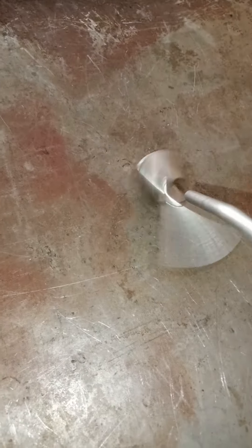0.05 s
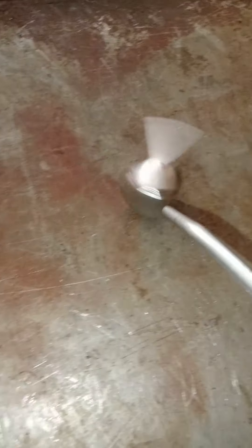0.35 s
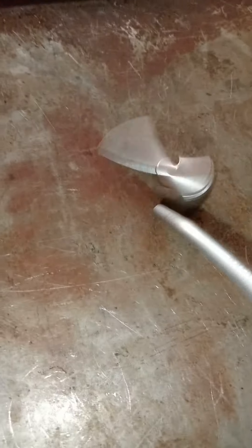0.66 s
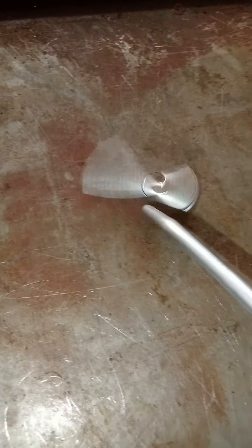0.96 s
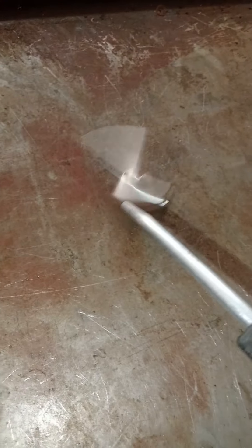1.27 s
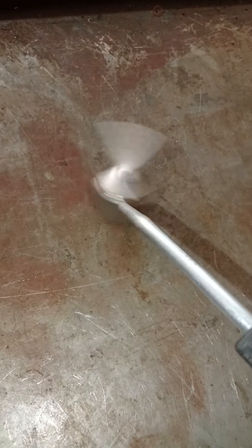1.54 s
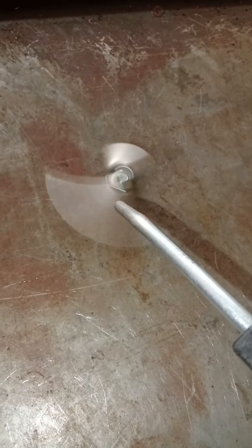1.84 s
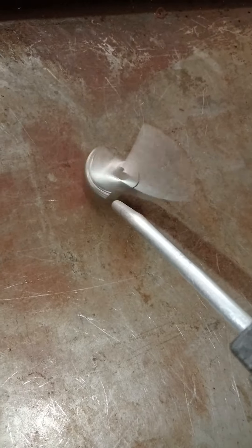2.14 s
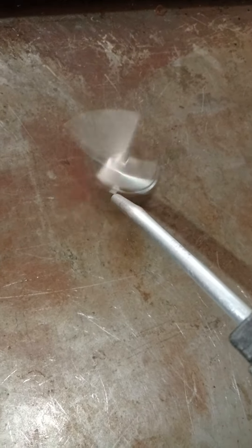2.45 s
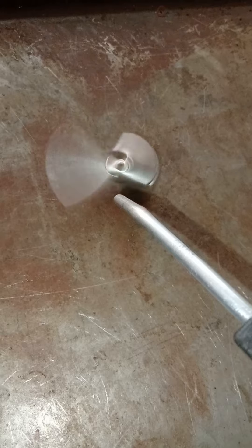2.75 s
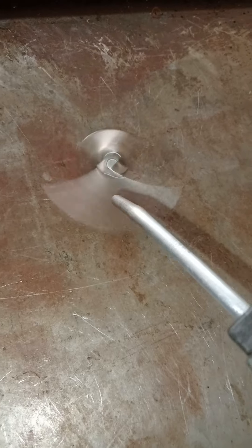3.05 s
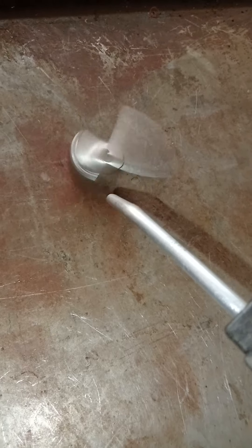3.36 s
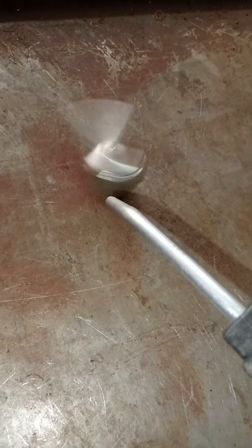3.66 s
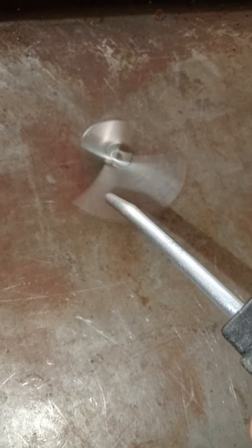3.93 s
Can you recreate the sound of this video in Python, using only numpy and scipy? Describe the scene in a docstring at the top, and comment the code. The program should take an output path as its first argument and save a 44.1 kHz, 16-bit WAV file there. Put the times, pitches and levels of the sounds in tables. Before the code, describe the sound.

A loud air jet, chopped into quickening, hissing gusts by a spinning metal piece.

```python
"""A workshop, close to a steel bench. An air gun blows on a small metal piece lying there and spins it
up from about 5 to 9 turns a second. Twice a turn an edge cuts the jet with a roaring gust, the leading
one dropping in pitch; between them the open jet hisses brightly. Spilled air buffets the microphone,
and thin whistles and a faint hum come up as the piece gains speed."""
import sys
import numpy as np
from scipy import signal
from scipy.fft import rfft, irfft
from scipy.io import wavfile
from scipy.ndimage import uniform_filter1d

SR = 44100
rng = np.random.default_rng(int(sys.argv[2]) if len(sys.argv) > 2 else 0)


def dump(signal):
    """Clip the signal to [-1, 1] and save it as 16-bit WAV at the path in sys.argv[1]."""
    limited = np.clip(np.atleast_2d(signal).T, -1, 1)
    pcm = np.round(limited * 32767).astype(np.int16)
    wavfile.write(sys.argv[1], SR, pcm)


N = 176400

# One row per turn, from the leading edge's cut: start_s, lead_db, trail_delay_turns, trail_db, hiss_db
ROTATIONS = [(-0.118, -5, 0.48, -3, 2.5), (0.064, 0.4, 0.48, -1.5, -2), (0.232, 2.9, 0.38, -1.6, -3.5),
             (0.415, 1.5, 0.39, -1.8, 1.0), (0.601, 1.5, 0.4, 1, 0.4), (0.76, 1.8, 0.43, -4, 2.0),
             (0.923, 3.5, 0.45, 1, 1.8), (1.082, 3.2, 0.48, 1, -0.5), (1.229, 0.7, 0.5, 0.5, -1),
             (1.367, 1.5, 0.48, -2.5, -0.1), (1.502, 2.0, 0.43, -2.5, 1.1), (1.632, 2.5, 0.44, -1.5, 1.2),
             (1.751, 4.5, 0.4, -2.5, 1.5), (1.872, 3.5, 0.48, 2.5, 1.3), (1.984, 2, 0.5, -0.9, -6),
             (2.105, 2.5, 0.46, -1, -2.3), (2.219, 1.7, 0.45, 2.3, -2.5), (2.331, 2.3, 0.41, -0.1, -1),
             (2.444, 1, 0.39, -2, -0.5), (2.553, 2.5, 0.48, 0.5, -1.5), (2.662, 0.1, 0.46, 0.1, -4.5),
             (2.775, 2, 0.45, 1.0, -3), (2.882, 2.5, 0.45, 2, -0.5), (2.993, 1.2, 0.48, 1.2, -1.7),
             (3.099, 3.5, 0.44, 1.5, -2), (3.207, -1.5, 0.42, -0.5, -5.5), (3.32, -1.5, 0.39, 0.5, -0.5),
             (3.431, 0.0, 0.42, 1, -5), (3.545, 0, 0.42, 1, -6), (3.653, 2.5, 0.38, -2, -1.5),
             (3.763, 2.5, 0.43, 2, 0.5), (3.869, 0.3, 0.44, 2.5, 0.3), (3.976, 1, 0.45, 2, -0.1),
             (4.09, 8, 0.45, 8, 8)]


def chopped_jet():
    """Turbulent air chopped by the spinning piece: two gusts, open hiss and buffeting in every turn."""
    # Colour of the air noise over the bench: freq_hz, gain_db
    bench_colour = [(20, -44), (38, -48), (58, -25), (100, -22), (180, -19.5), (265, -20), (500, -17.5),
                    (760, -16.5), (880, -13.5), (1090, -17), (1230, -14), (1420, -7), (1540, -9),
                    (1720, -7), (1900, -13), (2030, -11.5), (2140, -1.5), (2240, 1.56), (2440, -1),
                    (2630, -4.5), (2800, -3.5), (3300, -7.5), (3600, -7), (3870, -5.5), (4300, -12),
                    (4560, -17.5), (5000, -18.5), (5600, -20.5), (6250, -25), (7200, -18.5), (7750, -22),
                    (8200, -16.5), (9150, -18), (9550, -26), (10100, -23), (10700, -25.5), (11500, -20),
                    (12000, -30), (12650, -29), (13550, -27), (13900, -28), (15500, -31.5)]
    # Each part's share of that colour: freq_hz, gain_db
    lead_shape = [(300.0, -11.5), (900.0, -0.5), (1400.0, 1.1), (2300.0, 2.5), (3000.0, 4.5), (4000.0, 2.5),
                  (5200.0, 1.5), (7000.0, -5.5), (15000.0, -11)]
    trail_shape = [(300.0, -5.5), (900.0, -10.5), (1400.0, -4.5), (2300.0, -1.6), (3000.0, 1.4),
                   (4000.0, 2.5), (5200.0, 6.5), (7000.0, 0.1), (15000.0, -6.5)]
    hiss_shape = [(200.0, 0.2), (900.0, -3), (2300.0, -0.85), (4000.0, -3), (5500.0, -3), (8500.0, 0.1),
                  (15000.0, 1.5)]
    buffet_shape = [(30.0, -3), (100.0, -4), (200.0, -1.5), (400.0, -3), (900.0, -0.6), (3000.0, -12)]
    steady_shape = [(60, 3), (400, 0.5), (1400, 1.5), (2200, -5), (4000, -4.5), (6000, -4), (9000, -1.2),
                    (15000, 0)]  # hiss that is never shadowed
    frame, hop, rms_db = 512, 64, -14.5
    body_below_hz, top_above_hz, pivot_hz = 2000, 3580, 2550
    hz, t, noise = signal.stft(rng.standard_normal(N), SR, nperseg=frame, noverlap=frame - hop)
    t = t[:, None]
    turn = turns_made(t)
    _, lead_db, trail_delay_turns, trail_db, hiss_db = np.transpose(ROTATIONS)
    rise_turns, trail_turns, body_db, top_db, steady_db, buffet_db, _ = jet_contact(t)
    body = 1 / (1 + (hz / body_below_hz) ** 40)
    top = 1 - 1 / (1 + (hz / top_above_hz) ** 8)
    gust_gain = amp(body_db * body + top_db * top)
    octaves_down = np.log2(pivot_hz / np.clip(hz, 700, 5000))
    lead_turn = turn - 0.051 * octaves_down  # lows come later: the pitch drops
    trail_turn = turn + 0.043 * octaves_down - 0.4 * (hz < body_below_hz)  # sweeps up; body comes late
    lead = swell(lead_turn, rise_turns, 0.07, lead_db)
    trail = swell(trail_turn, trail_turns, trail_turns, trail_db, trail_delay_turns)
    power = (gust_gain * gain_at(lead_shape, hz)) ** 2 * lead
    power += (gust_gain * gain_at(trail_shape, hz)) ** 2 * trail
    power += gain_at(hiss_shape, hz) ** 2 * swell(turn - 0.55, 0.15, 0.22, hiss_db)
    power += (amp(buffet_db) * gain_at(buffet_shape, hz)) ** 2 * swell(turn - 0.81, 0.1, 0.1)
    power += (amp(steady_db) * gain_at(steady_shape, hz)) ** 2
    # Contrast boost: makes the gusts stand out and the gaps between them quieter.
    power *= (power / uniform_filter1d(power, size=110, axis=0)) ** 0.17
    eddy_db = 1.86 * eddies(power.shape, frames=14, bins=4)
    flutter_db = 0.6 * eddies(t.shape, frames=3, bins=1)
    treble_drift_db = 1.47 * top * eddies(power.shape, frames=200, bins=2)
    envelope = np.sqrt(power) * amp(eddy_db + flutter_db + treble_drift_db)
    air = signal.istft(noise * envelope.T, SR, nperseg=frame, noverlap=frame - hop)[1][:N]
    colour = gain_at(bench_colour, np.fft.rfftfreq(2 * N, 1 / SR))
    return amp(rms_db) * unit_rms(irfft(rfft(air, 2 * N) * colour)[:N])


def turns_made(t):
    """Angle of the piece at times t, in turns."""
    return np.interp(t, np.transpose(ROTATIONS)[0], np.arange(len(ROTATIONS)))


def jet_contact(t):
    """How the jet meets the piece at times t: slowly changing gust widths and levels."""
    # time_s, lead_rise_turns, trail_width_turns, body_db, top_db, steady_db, buffet_db, whistle_db
    contact = [(0.0, 0.14, 0.2, -5.5, 5.5, -9.5, -6, -16.5), (0.3, 0.2, 0.14, -6.5, 1.5, -3, 1.5, -13),
               (0.6, 0.16, 0.15, -1.2, 1.0, -6.5, -4, -10), (0.8, 0.023, 0.084, -2.8, 0.2, -6, -1, 2),
               (1.3, 0.076, 0.11, -7, 0.5, -13, -1.5, -30), (1.9, 0.096, 0.17, -3.5, -0.6, -4.8, -0.5, -13),
               (2.4, 0.058, 0.093, -1.8, -1.3, -7, 5, 3.5), (2.9, 0.071, 0.12, 0.5, -2, -2.5, -3.9, -7.5),
               (3.3, 0.11, 0.15, 4.5, 0, -3.5, -1.3, -12), (3.65, 0.053, 0.061, 4, -2, 1.4, -2.5, 2.5),
               (4.0, 0.011, 0.066, 1, -8, 0.6, -5, -6)]
    time_s, *columns = np.transpose(contact)
    return [np.interp(t, time_s, column) for column in columns]


def swell(turn, rise_turns, fall_turns, levels_db=(0,), delays_turns=(0,)):
    """Power of a bell-shaped swell in every turn, each with its own level and delay."""
    power = 0
    for neighbour in (-1, 0, 1):
        index = np.floor(turn).astype(int) + neighbour
        past_peak = turn - index - np.take(delays_turns, index, mode="clip")
        bell = np.exp(-.5 * (past_peak / np.where(past_peak < 0, rise_turns, fall_turns)) ** 2)
        power = power + np.take(amp(levels_db) ** 2, index, mode="clip") * bell
    return power


def eddies(shape, frames, bins):
    """Turbulence: random patches in time and frequency, rms 1."""
    streaks = uniform_filter1d(rng.standard_normal(shape), frames, axis=0)
    return unit_rms(uniform_filter1d(streaks, bins, axis=1))


def stray_blasts():
    """Air thrown off the piece: soft low thumps on the microphone and short hollow rushes."""
    # peak_s, sigma_s, centre_hz, width_hz, level_db
    blasts = [(0.01, 0.0097, 131, 139, -33), (0.193, 0.0099, 167, 80, -36), (0.566, .014, 156, 90, -35),
              (0.727, 0.019, 151, 120, -33), (0.842, 0.011, 880, 250, -28), (0.875, .013, 156, 130, -34.5),
              (1.028, 0.019, 147, 120, -34.5), (1.303, 0.011, 162, 80, -34), (1.444, .022, 106, 50, -36),
              (1.629, .008, 150, 80, -45), (1.94, 0.011, 190, 120, -34), (2.314, 0.013, 870, 150, -28),
              (3.427, 0.022, 880, 200, -29.5), (3.642, 0.0072, 230, 520, -27),
              (3.668, 0.0057, 890, 200, -24), (3.893, .008, 910, 200, -24), (3.935, 0.029, 209, 140, -35)]
    t = np.arange(N) / SR
    return sum(amp(level_db) * np.exp(-.5 * ((t - peak_s) / sigma_s) ** 2) * noise_band(hz, width_hz)
               for peak_s, sigma_s, hz, width_hz, level_db in blasts)


def whistles():
    """Thin whistles and a hollow low hoot of air over the metal, each swelling once a turn."""
    # Whistle bands: pitch_hz, width_hz, level_db
    bands = [(8860, 200, -51), (11300, 70, -49), (11470, 150, -38.5), (13600, 200, -50), (15420, 90, -51)]
    t = np.arange(N) / SR
    turn, whistle_db = turns_made(t), jet_contact(t)[-1]
    thin = sum(amp(db + whistle_db) * noise_band(hz, width_hz) for hz, width_hz, db in bands)
    hoot = amp(-49.5) * noise_band(centre_hz=175, width_hz=32)
    return thin * np.sqrt(swell(turn - 0.8, 0.3, 0.3)) + hoot * np.sqrt(swell(turn - 0.88, 0.2, 0.2))


def hum():
    """A faint, wavering tone that rises while the piece picks up speed."""
    # time_s, pitch_hz, level_db
    glide = [(1.7, 430, -72), (1.87, 445, -41), (2.05, 470, -46.5), (2.29, 501, -37.5), (2.55, 532, -68.5)]
    time_s, pitch_hz, level_db = np.transpose(glide)
    t = np.arange(N) / SR
    tone = np.sqrt(2) * np.sin(2 * np.pi * np.cumsum(np.interp(t, time_s, pitch_hz)) / SR)
    waver = noise_band(centre_hz=0, width_hz=14)
    return amp(np.interp(t, time_s, level_db)) * tone * waver


def room_tail(x, level_db=-16.5, t60_s=0.2, gap_s=0.004):
    """The workshop's short, faint reverberation."""
    t = np.arange(SR // 2) / SR
    tail = rng.standard_normal(len(t)) * np.exp(-np.log(1000) * t / t60_s) * (t > gap_s)
    return amp(level_db) * signal.fftconvolve(x, tail / np.linalg.norm(tail))[:N]


def noise_band(centre_hz, width_hz):
    """Noise in one narrow resonance, rms 1."""
    hz = np.fft.rfftfreq(N, 1 / SR)
    return unit_rms(irfft(rfft(rng.standard_normal(N)) / (1 + (2 * (hz - centre_hz) / width_hz) ** 2), N))


def gain_at(spectrum, hz):
    """Gain of a spectrum table, interpolated over log frequency."""
    freq_hz, gain_db = np.transpose(spectrum)
    return amp(np.interp(np.log(hz + 1), np.log(freq_hz + 1), gain_db))


def amp(db):
    """Decibels to gain."""
    return 10 ** (np.asarray(db) / 20)


def unit_rms(x):
    """Scales to rms 1."""
    return x / np.sqrt(np.mean(x ** 2) + 1e-20)


def scene():
    """The jet and its tones with the room's tail, plus dry stray blasts; mono."""
    air = chopped_jet() + whistles() + hum()
    return (air + room_tail(air) + stray_blasts())[None]


def record(dry, ceiling=0.78, cutoff_hz=15560):
    """Rounds off the highest peaks, then low-passes."""
    rounded = dry / (1 + (dry / ceiling) ** 6) ** (1 / 6)
    lowpass = signal.firwin(1023, cutoff_hz, window=("kaiser", 9), fs=SR)
    return signal.oaconvolve(rounded, lowpass[None], "same")


dry = scene()
out = record(dry)
dump(out)
```